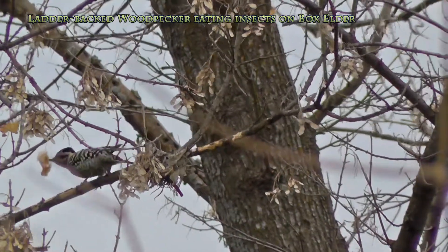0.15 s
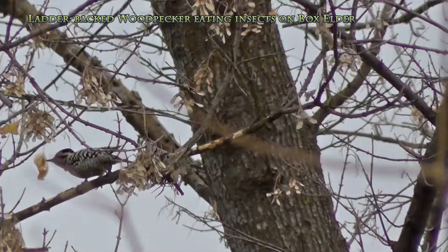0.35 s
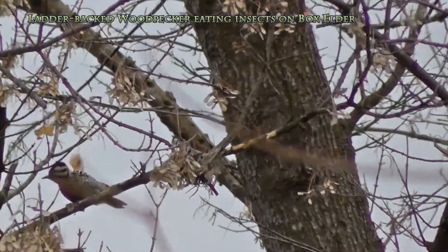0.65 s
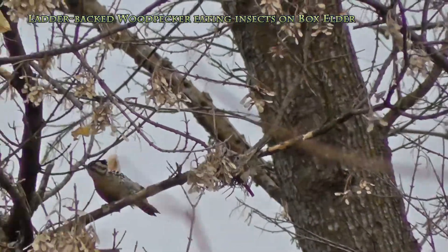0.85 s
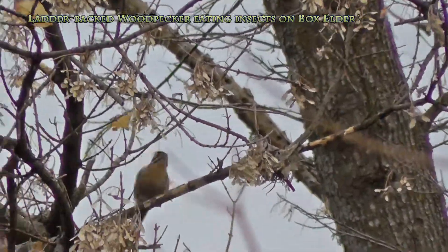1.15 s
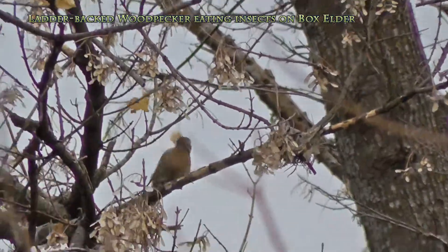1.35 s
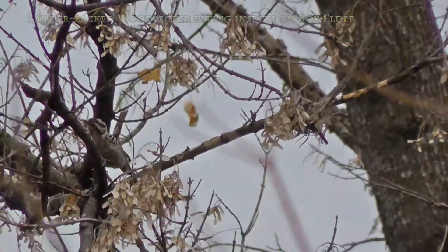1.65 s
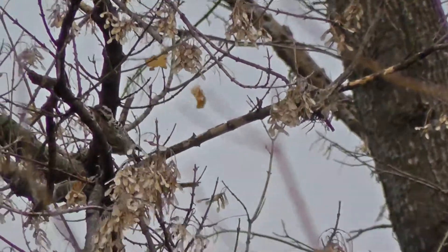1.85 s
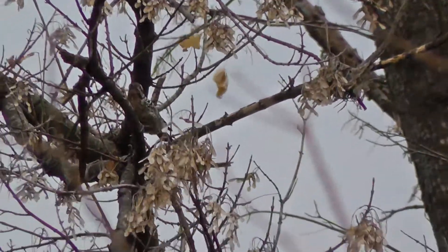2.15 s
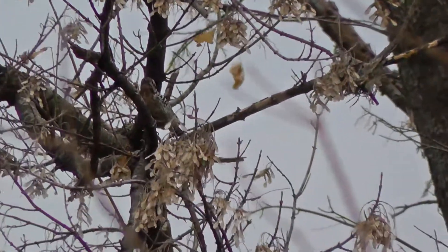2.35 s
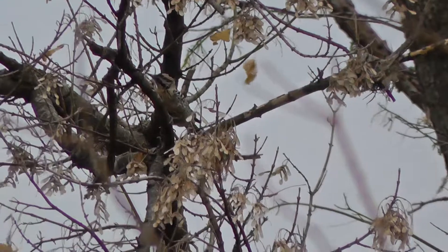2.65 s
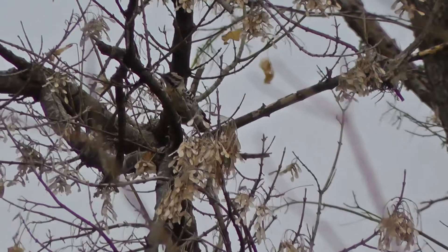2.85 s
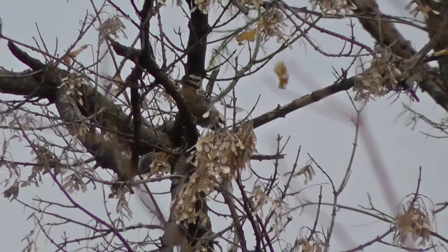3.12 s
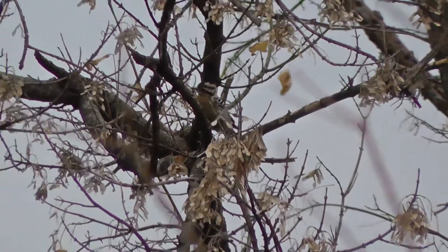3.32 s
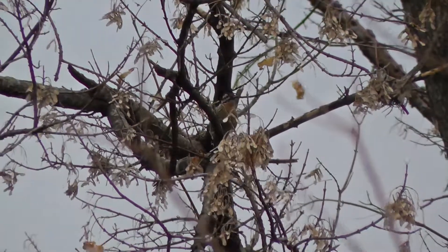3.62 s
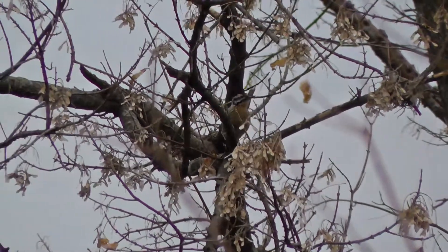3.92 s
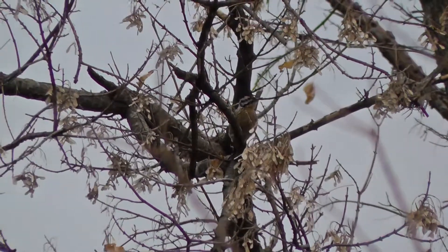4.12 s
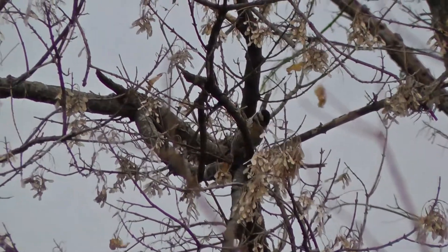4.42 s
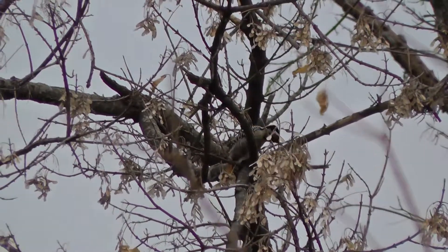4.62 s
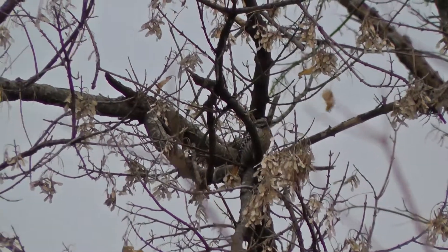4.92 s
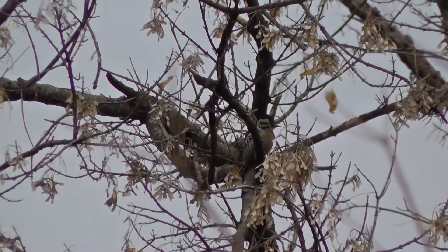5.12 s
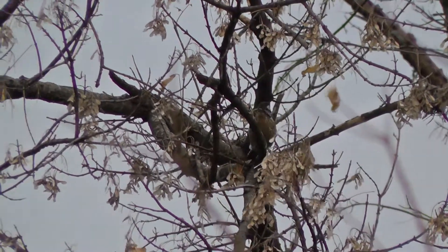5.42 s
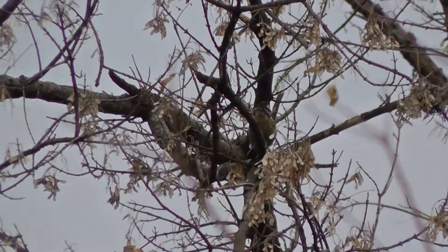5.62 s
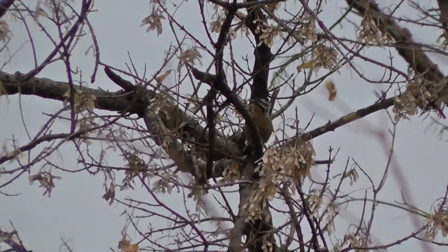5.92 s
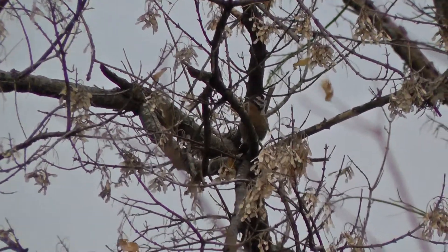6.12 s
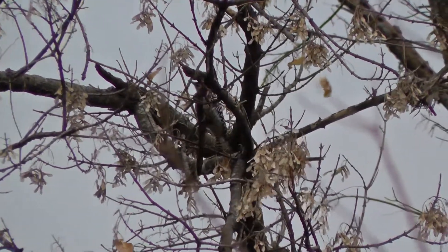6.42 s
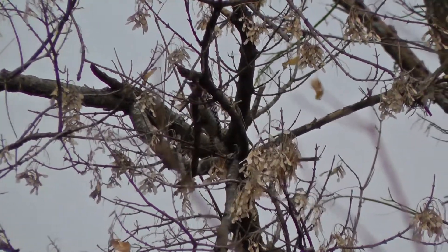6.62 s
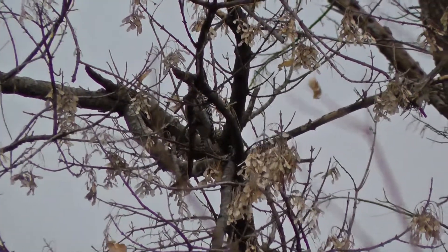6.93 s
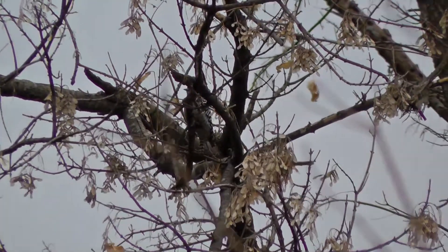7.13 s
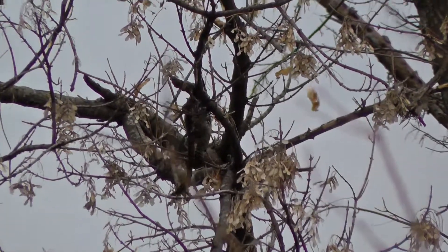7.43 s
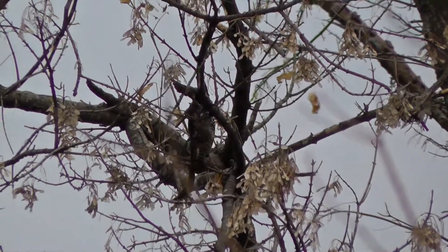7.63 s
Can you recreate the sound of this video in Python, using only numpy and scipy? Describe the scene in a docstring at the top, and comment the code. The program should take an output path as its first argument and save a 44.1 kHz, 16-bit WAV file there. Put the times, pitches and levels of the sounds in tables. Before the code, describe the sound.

Quiet outdoor air with faint trills and thin whistles, then bright chirps, louder and denser, ending in a descending run of rapid buzzing bird notes.

```python
"""Small songbirds in bare trees

Birds chatter in four kinds of falling call and quick trills; later, buzzy notes overlap.
Each voice is a nearly pure tone with a gliding pitch, and the buzzes flutter rapidly as they fall.
Thin whistles and faint answering chirps come from farther off, and branches scatter every call.
Two short ticks and one slowly fading burst are shaped from noise, as are a low distant hum,
a soft rush of air and a faint hiss with a thin whine.
"""
import sys
import numpy as np
from scipy import signal
from scipy.fft import rfft, irfft, next_fast_len
from scipy.io import wavfile
from scipy.ndimage import map_coordinates

SR = 44100
rng = np.random.default_rng(int(sys.argv[2]) if len(sys.argv) > 2 else 0)


def transcribe(u):
    """Save the signal u as a 16-bit wav file named by the first command-line argument.

    u: samples, shape (n,) or (channels, n), limited to [-1, 1]; the rate is SR.
    q: integer samples, one column per channel.
    """
    v = np.clip(np.atleast_2d(u).T, -1, 1)
    q = np.round(v * 32767).astype(np.int16)
    wavfile.write(sys.argv[1], SR, q)


N = 342657

# The syllables of each kind of call:
# delay/s, length/s, start f/Hz, middle f/Hz, end f/Hz, level/dB, all relative to the times and factors below
PEEK_SYLLABLES = [(0, .054, 5005, 3432, 2600, 1), (.046, .032, 2520, 2187, 1883, -21.5)]  # a loud steep fall with a low tail
DOUBLE_PEEK_SYLLABLES = [(0, .06, 4930, 3325, 2737, -1.5), (.053, .039, 3688, 3155, 2540, -7),
                         (.076, .028, 2400, 2190, 1980, -26)]  # two falls with a low tail
CHIP_SYLLABLES = [(0, .045, 3814, 2712, 1696, 0.5), (.043, .055, 3740, 3240, 3150, -15.5),
                  (.066, .033, 2400, 2150, 1800, -17.5)]  # one fall and two softer notes
CHUP_SYLLABLES = [(0, .032, 2990, 2280, 1612, -1), (.006, 0.083, 5250, 3234, 3450, -8),
                  (.042, .038, 2790, 2280, 1830, -4), (.068, .078, 3950, 3227, 3090, -8.5)]  # two soft low notes, each with a higher second voice
# When each kind is called: t/s, level/dB, length factor, pitch factor
PEEK_CALLS = [(1.368, -33.5, 0.94, 0.97), (1.694, -54, 1.45, .96), (2.629, -27, 0.92, 0.96),
              (3.341, -58.5, 1.1, 0.9), (4.197, -31, 1.07, 1), (4.353, -30, 1.076, 0.98),
              (5.6, -52.5, 1.13, 1.16)]
DOUBLE_PEEK_CALLS = [(2.151, -28, .97, 1.003), (3.081, -28.5, 0.94, 0.97), (4.858, -26.5, 1.07, 1)]
CHIP_CALLS = [(2.283, -38, 1, 0.98), (3.013, -39, 1.06, 0.97), (4.169, -41, 1.19, 0.95),
              (4.466, -38.5, 1.2, 0.99), (4.781, -38.5, 1.12, 0.96)]
CHUP_CALLS = [(1.574, -44, 1, 1.025), (1.917, -49, 1.04, 0.96), (2.531, -45.5, 0.98, 0.98),
              (3.851, -47, 1, 0.98), (5.299, -51.5, 0.9, .98)]

# Buzzes that soon sag and level out: t/s, length/s, start f/Hz, end f/Hz, level/dB,
# swell from start to end/dB, flutter f/Hz, overtone change/dB, left minus right/dB
SAGGING_BUZZES = [ (4.608, 0.15, 3720, 2890, -35.5, -4, 139, -2, -2),
                  (5.122, 0.16, 4106, 3500, -34, -2, 147, -14, -1.5),
                  (5.404, 0.15, 3190, 2506, -44.5, -14, 150.2, -17.5, -0.5),
                  (5.654, 0.15, 3102, 2512, -46.5, -12, 168.5, -9, 1),
                  (5.918, 0.15, 3760, 2824, -36.5, -16.5, 172, -5.5, -1),
                  (6.159, .14, 3638, 3150, -31, -1.5, 175.7, -3.5, -1),
                  (6.243, 0.093, 3104, 2643, -41, -4, 171.8, -3, 0),
                  (6.286, .14, 4228, 3577, -30, 6, 165.8, -5, -1),
                  (6.414, 0.12, 3547, 3031, -31, -12, 183.8, -8, -0.5),
                  (6.628, .156, 3730, 2860, -32.5, -16, 169.6, -11, -1),
                  (6.944, .186, 3574, 2903, -33, -14, 173.1, -12.5, -3.5),
                  (7.214, .12, 3327, 2670, -42, 3, 139.1, -4.5, 4),
                  (7.318, 0.13, 3523, 2820, -42, -11.5, 153.2, -7.5, -6.5)]
# Slower buzzes that hold their pitch and drop at the end: t/s, length/s, start f/Hz, end f/Hz, level/dB,
# swell from start to end/dB, overtone change/dB
HELD_BUZZES = [(4.234, .12, 3860, 3500, -37.5, 2.5, -16), (5.092, .12, 3400, 2670, -37.5, -7, -7.5),
               (5.534, .11, 2858, 2170, -47, -3, -4.5), (5.536, 0.081, 3740, 2990, -51, 12, -1),
               (5.699, .134, 3954, 3412, -32, 4, -4.5)]
SAG_BEND, HELD_BEND = 3.2, 2  # how sharply the fall crowds into the start, or the end, of a buzz
HELD_FLUTTER_HZ, HELD_PAN_DB = 132.4, -1  # pan is left minus right
FLUTTER_SLEW = 30300  # sets the pitch swing once divided by flutter f/Hz: a faster flutter swings less far
LINGER = 1.7  # power of the progress through a buzz: the pitch lingers before it falls

# Trills, before the creep in pitch: t/s, number of notes, spacing/s, top f/Hz, bottom f/Hz, level/dB
TRILLS = [ (.089, 4, 0.021, 3016, 1640, -55), (0.252, 4, 0.02, 3055, 1690, -54.5),
          (0.634, 5, 0.019, 3030, 1560, -51), (0.843, 5, .018, 3040, 2090, -51.5),
          (1.032, 4, 0.013, 3130, 2120, -62), (1.088, 4, 0.0082, 3790, 2830, -57),
          (1.69, 5, 0.021, 3430, 1704, -50), (1.985, 5, 0.019, 3830, 2354, -45),
          (2.393, 5, 0.021, 3724, 1694, -47), (2.852, 5, 0.018, 3943, 2160, -40.5),
          (3.524, 5, .0232, 3580, 1676, -52.5), (3.745, 5, 0.02, 3297, 2270, -50),
          (3.966, 5, 0.022, 3720, 1655, -47), (4.568, 4, 0.017, 3840, 1810, -48),
          (5.062, 6, .012, 4350, 2196, -42)]
# Thin distant whistles and slides: t/s, length/s, middle f/Hz, arch f/Hz, rise f/Hz, level/dB
WHISTLES = [ (.005, 0.04, 4350, 37, -100, -64), (0.056, 0.035, 3720, 63, -200, -68),
            (0.188, 0.023, 5660, 46, 0, -64), (0.231, 0.11, 4490, 953, -9, -63),
            (0.452, 0.066, 4623, 101, 225, -58.5), (1.061, 0.095, 3594, 251, -1150, -66),
            (1.185, 0.072, 3670, 67, -400, -74), (2.845, 0.061, 3595, -280, -1000, -45.5),
            (2.985, 0.077, 4570, 507, -750, -60), (3.4, .045, 3830, 100.5, 3, -63),
            (3.654, 0.086, 4386, 90, -7, -66), (4.077, 0.11, 4170, -620, 288, -63.5),
            (4.734, 0.11, 4095, -260, -470, -55.5), (6.116, 0.067, 4756, 526, -600, -55.5),
            (6.59, 0.11, 4240, 153.5, -300, -58), (6.897, .045, 5080, 404, -1500, -68),
            (7.183, 0.057, 5890, 1402, -200, -63)]
# Short ticks and one slowly fading noise burst: t/s, centre f/Hz, peak level/dB, time to fall by 60 dB/s
BURSTS = [(1.896, 3960, -61, 0.01), (5.853, 5170, -41.5, 0.015), (7.645, 3050, -53, 0.85)]

# Overtones of a buzz; the voice slips weakly into half its pitch: multiple of pitch, level before the beak/dB
BUZZ_PARTIALS = [(1 / 2, -63), (3 / 2, -50.5), (2, -28.5), (5 / 2, -45), (3, -31)]
# Overtones of every other note: multiple of pitch, level before the beak/dB
CHIRP_PARTIALS = [(2, -33), (3, -33.5)]
# How well the throat and beak let overtones out: f/Hz, level/dB
BEAK = [(1500, 6), (4500, 21.5), (5500, 9.5), (6600, 1.5), (7900, 11), (9000, -5), (10000, -4.5),
        (11200, -4.5), (12300, -5)]

# How long the wood rings on: f/Hz, time to fall by 60 dB/s
TREES = [(1500, 0.6), (3200, 0.77), (7000, 1), (12000, 0.93)]
# Overtones scatter more among the twigs: f/Hz, level/dB
SPREAD = [(2000, 14), (4500, 3), (6000, 17.5), (8000, 11), (11500, 13)]
# Stereo balance of the birds: f/Hz, left minus right level/dB
BALANCE = [(2000, -4.5), (3200, -3), (4500, 3), (7500, 3), (11000, 1)]

# Rise and fall of the hum and rush, before their overall gains: t/s, hum level/dB, rush level/dB
AMBIENCE = [(0.0, -82, -82), (0.17, -78.5, -82.5), (1.2, -86, -94), (5.16, -86, -96.5), (6.35, -82, -96),
            (7.2, -86, -96.5), (7.6, -86, -100)]
# Rise and fall of the hiss: t/s, level/dB
HISS_LEVEL = [(0, -71.5), (.9, -80), (1.3, -77), (4, -80.5), (7.77, -78)]
# Colours of the three noises: f/Hz, relative level/dB
HUM = [(13, -54), (22, -33), (81, -13), (129, -3), (172, 0), (222, -3.5), (268, -16), (341, -13.5),
       (450, -26.5), (580, -32), (990, -120)]
RUSH = [(25, -28), (60, -6.5), (120, -3.5), (270, -21), (450, -4.5), (720, -1), (1000, -4.5), (1400, -12),
        (2500, -7), (5000, -27.5)]
HISS = [(1200, -25.5), (2200, -3.5), (4200, -2), (5500, -9.5), (7500, -17.5), (8600, -8.5), (9450, -0.5),
        (9800, -22.5), (10600, -42), (12000, -35.5)]
TOP_HZ = 12150


def chirps():
    """The birds repeat four kinds of call, a little longer or shorter, higher or lower each time."""
    out = np.zeros(N)
    kinds = [(PEEK_SYLLABLES, PEEK_CALLS), (DOUBLE_PEEK_SYLLABLES, DOUBLE_PEEK_CALLS),
             (CHIP_SYLLABLES, CHIP_CALLS), (CHUP_SYLLABLES, CHUP_CALLS)]
    for syllables, events in kinds:
        for s, db, stretch, pitch in events:
            add(out, s, amp(db) * call(syllables, stretch, pitch))
    return out


def call(syllables, stretch, pitch, accent_db=9, accent_hz=3500, accent_width=0.15, echo_db=-11, overtones_db=-5):
    """Falling notes, each boosted as its pitch passes the throat's resonance."""
    out = np.zeros(SR // 2)
    for delay, length, *pitches, db in syllables:
        pitches = pitch * np.array(pitches)
        hz = glide(stretch * length, pitches)[2]
        accent = accent_db / (1 + (np.log(hz / accent_hz) / accent_width) ** 2)
        note = slur(stretch * length, pitches, skew=0.67, sharpness=1.07, waver=0.012, overtones_db=overtones_db)
        note = amp(db + accent - accent.max()) * note
        add(out, stretch * delay, bough(note, echo_db))
    return out


def buzzes():
    """Sagging and held buzzes overlap, each placed between left and right by its own pan; the held ones share
    one."""
    notes = []
    for s, length, start_hz, end_hz, db, swell_db, flutter_hz, overtones_db, pan_db in SAGGING_BUZZES:
        note = buzz(length, start_hz, end_hz, -SAG_BEND, swell_db, flutter_hz, overtones_db)
        notes.append((s, db, pan_db, note))
    for s, length, start_hz, end_hz, db, swell_db, overtones_db in HELD_BUZZES:
        note = buzz(length, start_hz, end_hz, HELD_BEND, swell_db, HELD_FLUTTER_HZ, overtones_db)
        notes.append((s, db, HELD_PAN_DB, note))
    left, right = np.zeros(N), np.zeros(N)
    for s, db, pan_db, note in notes:
        add(left, s, amp(db + pan_db / 2) * note)
        add(right, s, amp(db - pan_db / 2) * note)
    return np.array([left, right])


def buzz(length, start_hz, end_hz, bend, swell_db, flutter_hz, overtones_db, attack=0.018, release=0.0059,
         arch_db=5, pulsing=0.25, pulse_lead=0.72, unevenness=0.048, echo_db=-13, late_echo_db=-17,
         scoop_hz=300, scoop_s=.008, jitter_hz=14):
    """A falling note whose pitch and loudness flutter rapidly, the pitch flutter deepening as it goes on."""
    t = np.arange(int(length * SR)) / SR
    u = t / length  # progress 0-1

    fall = np.expm1(bend * u ** LINGER) / np.expm1(bend)
    scoop = scoop_hz * np.exp(-t / scoop_s)  # the note starts low and slides up
    hz = start_hz + (end_hz - start_hz) * fall - scoop

    flutter_rate = flutter_hz * (1 + unevenness * wobble(t, 61.9))
    flutter = 2 * np.pi * np.cumsum(flutter_rate) / SR
    depth = FLUTTER_SLEW / flutter_hz * (.62 + .33 * u) * (1 + .15 * wobble(t, 90))
    hz = hz + depth * np.sin(flutter) + jitter_hz * wobble(t, 390.0)

    edges = np.clip(np.minimum(t / attack, (length - t) / release), 0, 1)
    edges = np.sin(np.pi / 2 * edges) ** 2
    level = swell_db * (u - .5) - arch_db * (2 * u - 1) ** 2 + wobble(t, 69)
    pulse = 1 + pulsing * np.sin(flutter + pulse_lead)
    note = edges * amp(level) * pulse * syrinx(hz, BUZZ_PARTIALS, overtones_db)
    return bough(bough(note, echo_db), late_echo_db, delay_ms=14.0)


def trills(droop=.52, arch_db=7, rise=0.073, echo_db=-13):
    """Runs of tiny separate falling notes, loudest around the middle and creeping up in pitch."""
    out = np.zeros(N)
    for s, count, spacing, top_hz, bottom_hz, db in TRILLS:
        middle_hz = top_hz * (1 - droop) + bottom_hz * droop
        for i, place in enumerate(np.linspace(-1, 1, count)):
            creep = 1 + rise * place / 2 + rng.normal(0, .02)
            pitches = creep * np.array([top_hz, middle_hz, bottom_hz])
            note = slur(spacing * .9, pitches, skew=.9, sharpness=1.1, waver=.012, overtones_db=-14)
            note_db = db - arch_db * place ** 2 + rng.normal(0, 1.1)
            add(out, s + i * spacing, bough(amp(note_db) * note, echo_db))
    return out


def whistles(echo_db=-9):
    """Soft, high notes, each one gentle arch or dip in pitch."""
    out = np.zeros(N)
    for s, length, hz, arch_hz, rise_hz, db in WHISTLES:
        pitches = [hz - arch_hz - rise_hz / 2, hz, hz - arch_hz + rise_hz / 2]
        note = slur(length, pitches, skew=1, sharpness=.9, waver=.011, overtones_db=-15)
        add(out, s, bough(amp(db) * note, echo_db))
    return out


def chatter(count=5, answer_db=-56, within_s=.13):
    """The rest of the flock, farther off, answers each chip and chup with a few faint chirps."""
    out = np.zeros(N)
    for s, *_ in CHIP_CALLS + CHUP_CALLS:
        for wait, height, span, softness in rng.uniform(0, 1, (count, 4)):
            pitches = (2900 + 1600 * height) * np.array([1, .78, .66])
            note = slur(.02 + .025 * span, pitches, skew=.7, sharpness=.8, waver=.012)
            add(out, s + wait * within_s, amp(answer_db - 8.6 * softness) * note)
    return out


def slur(length, pitches, skew, sharpness, waver, overtones_db=0):
    """One slurred note that swells and fades; skew under 1 makes it peak early."""
    t, u, hz = glide(length, pitches)
    swell = np.abs(np.sin(np.pi * u ** skew)) ** sharpness
    wavering_hz = hz * (1 + waver * wobble(t, 276.7))
    return swell * syrinx(wavering_hz, CHIRP_PARTIALS, overtones_db)


def syrinx(hz, partials, overtones_db=0, fade_db=9):
    """The bird's voice box: a sine of rms 1 plus overtones that fade and peak at the beak's resonances."""
    t = np.arange(len(hz)) / SR
    phase = 2 * np.pi * np.cumsum(hz) / SR
    tone = np.sin(phase)
    for multiple, db in partials:
        fade = fade_db * (.5 - t / t[-1])
        patchy_db = 4 * wobble(t, 60)
        level = db + overtones_db + along(BEAK, multiple * hz) + fade + patchy_db
        tone = tone + amp(level) * np.sin(multiple * phase)
    return np.sqrt(2) * tone


def noise_bursts(width=0.17):
    """Ticks and a longer burst: fading noise around one pitch."""
    out, t = np.zeros(N), np.arange(N) / SR
    for s, centre_hz, db, t60 in BURSTS:
        fade = (t >= s) * np.exp(-np.log(1000) * np.abs(t - s) / t60)
        burst = rng.standard_normal(N) * fade
        burst = filtered(burst, lambda hz: np.exp(-(np.log((hz + 1) / centre_hz) / width) ** 2))
        out += amp(db) * burst / np.abs(burst).max()
    return out


def bough(note, echo_db, delay_ms=5.2):
    """A bough near the perch returns the note a moment late, so a moving pitch beats against itself."""
    lag = int(delay_ms * rng.uniform(.75, 1.25) * SR / 1000)
    return np.pad(note, (0, lag)) + amp(echo_db) * np.pad(note, (lag, 0))


def scatter(x, twigs_db=-19, twigs_t60=0.07, wood_db=-23, apart=0.54):
    """Twigs answer briefly, the wood with a long soft tail; left and right hear partly the same echoes."""
    # The wood: noise that dies away at a different speed for each frequency
    hz, t, cells = signal.stft(rng.standard_normal((2, SR)), SR, nperseg=256)
    cells = cells * amp(-60 * t / along(TREES, hz)[:, None])
    wood = signal.istft(cells, SR, nperseg=256)[1][:, :SR]
    # The twigs: short noise that starts after 2 ms
    t = np.arange(SR) / SR
    twigs = rng.standard_normal((2, SR)) * amp(-60 * t / twigs_t60) * (t > .002)
    mid, side = (amp(twigs_db) * unit(twigs) + amp(wood_db) * unit(wood)) / np.sqrt(SR)
    echoes = np.array([mid + apart * side, mid - apart * side])
    spread = filtered(x, lambda hz: amp(along(SPREAD, hz)))
    return signal.fftconvolve(spread, echoes, axes=1)[:, :N]


def background(hum_db=0.5, rush_db=3.0, apart=0.94):
    """A low far-off hum, a soft rush of air and a thin wide hiss: three noises whose levels drift."""
    hum, rush = curves(AMBIENCE)
    hiss, = curves(HISS_LEVEL)
    low = amp(hum + hum_db) * noise(HUM) + amp(rush + rush_db) * noise(RUSH)
    mid, side = noise(HISS), apart * noise(HISS)
    return low + amp(hiss) * np.array([mid + side, mid - side])


def whine(centre_hz=9392, width_hz=30, db=-88):
    """A very faint, thin whine: a narrow band of noise that rides on the hiss."""
    band = filtered(rng.standard_normal(N), lambda hz: np.exp(-((hz - centre_hz) / width_hz) ** 2))
    return amp(db) * unit(band)


def amp(db):
    """Decibels to gain."""
    return 10 ** (np.asarray(db) / 20)


def unit(x):
    """x scaled to rms 1."""
    return x / np.sqrt(np.mean(x ** 2) + 1e-20)


def along(points, hz):
    """Read (f/Hz, value) points on a log frequency axis."""
    f, values = np.transpose(points)
    return np.interp(np.log(hz + 1), np.log(f), values)


def curves(rows):
    """One value per sample for each column after the time."""
    s, *columns = np.transpose(rows)
    return [np.interp(np.arange(N) / SR, s, column) for column in columns]


def wobble(t, rate):
    """A smooth random curve over the times t of one note, with rate random points a second."""
    return map_coordinates(rng.standard_normal(128), [t * rate], mode="mirror")


def filtered(x, response):
    """x filtered by a response, real or complex, given as a function of f/Hz."""
    m = next_fast_len(N + SR // 2)  # padding keeps the end from wrapping onto the start
    return irfft(rfft(x, m) * response(np.fft.rfftfreq(m, 1 / SR)), m)[..., :N]


def noise(spectrum):
    """Coloured noise of rms 1."""
    return unit(filtered(rng.standard_normal(N), lambda hz: amp(along(spectrum, hz))))


def add(track, s, sound):
    """Mix a sound into the track at time s."""
    part = track[max(round(s * SR), 0):][:len(sound)]
    part += sound[:len(part)]


def glide(length, pitches):
    """Time, progress 0-1 and a smooth pitch through evenly spaced points."""
    t = np.arange(int(length * SR)) / SR
    u = t / length
    knots = np.linspace(0, 1, len(pitches))
    curve = np.polyfit(knots, pitches, len(pitches) - 1)
    return t, u, np.polyval(curve, u)


def scene(lead_ms=0.034, far_wet_db=5):
    """Far birds carry more echo; birds lean left or right by frequency, and all sound leads on the left."""
    near = buzzes() + chirps() + trills() + noise_bursts()
    far = whistles() + chatter()
    sides = np.array([[1], [-1]])  # left, right
    birds = near + far + scatter(near + amp(far_wet_db) * far)
    birds = filtered(birds, lambda hz: amp(sides * along(BALANCE, hz) / 2))
    lead = sides * lead_ms / 1000
    mix = birds + background() + whine()
    # Shift left and right half the lead each; the phase shift stops growing above 4500 Hz
    return filtered(mix, lambda hz: np.exp(1j * np.pi * np.minimum(hz, 4500) * lead))


def record(dry):
    """Keep only the sound below the top frequency."""
    return filtered(dry, lambda hz: hz < TOP_HZ)


dry = scene()
out = record(dry)
transcribe(out)
```